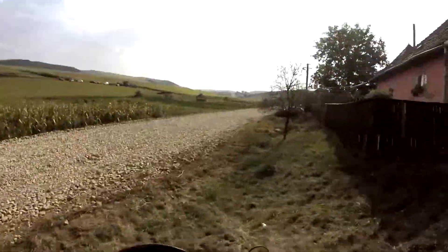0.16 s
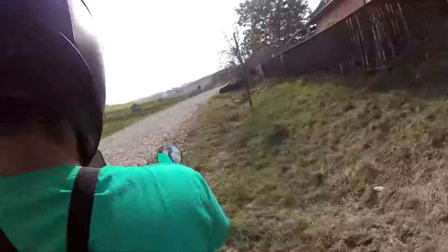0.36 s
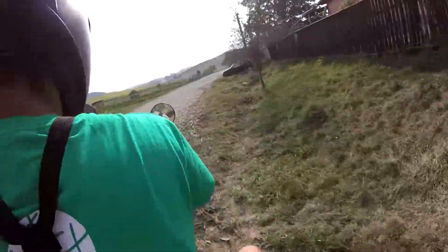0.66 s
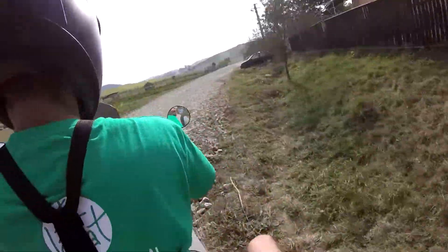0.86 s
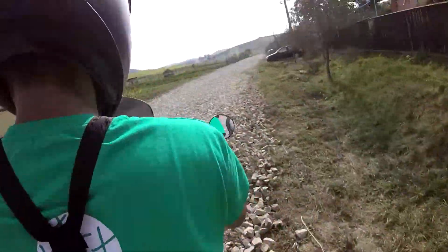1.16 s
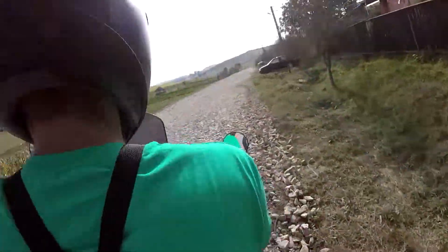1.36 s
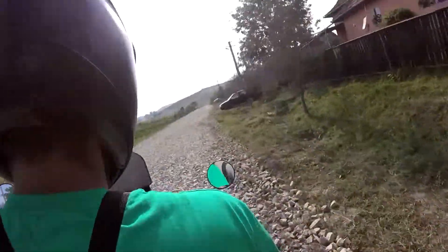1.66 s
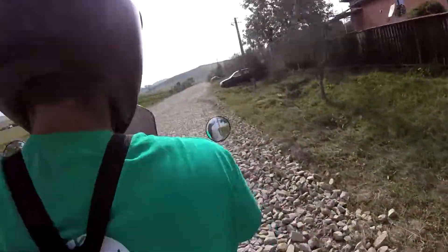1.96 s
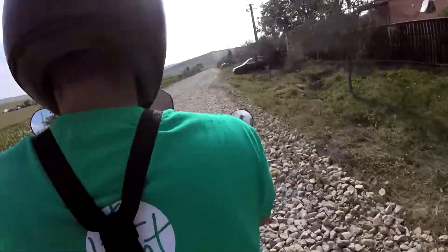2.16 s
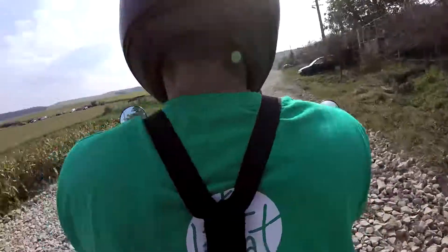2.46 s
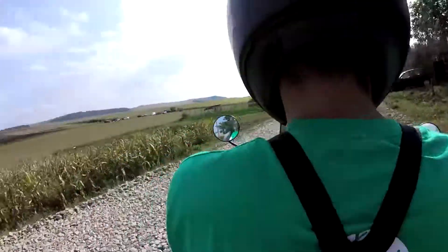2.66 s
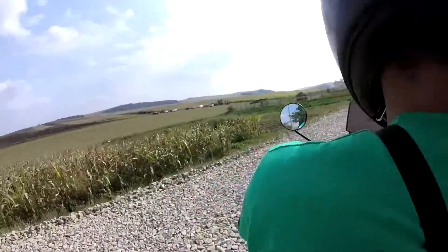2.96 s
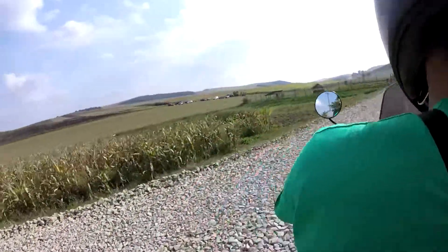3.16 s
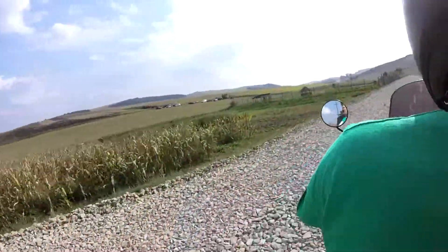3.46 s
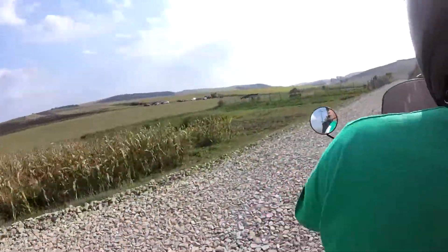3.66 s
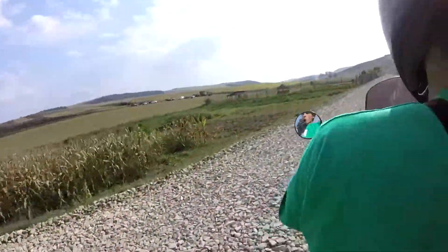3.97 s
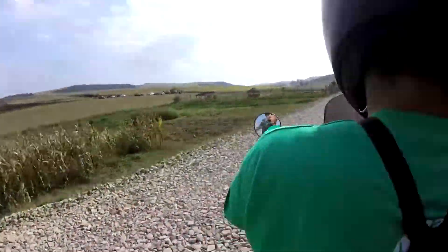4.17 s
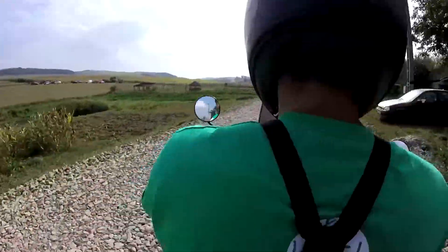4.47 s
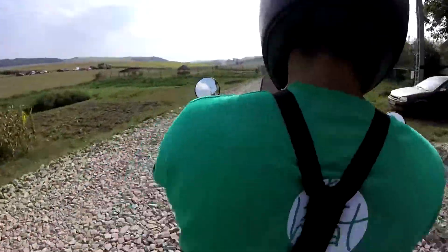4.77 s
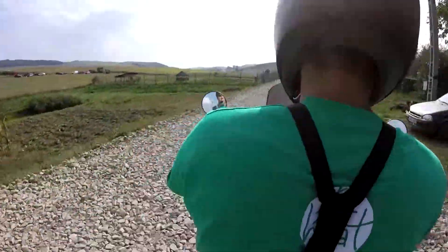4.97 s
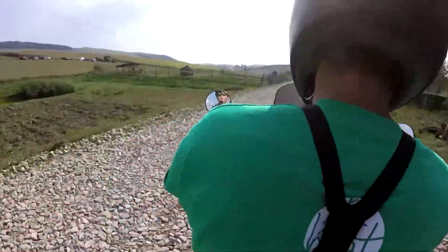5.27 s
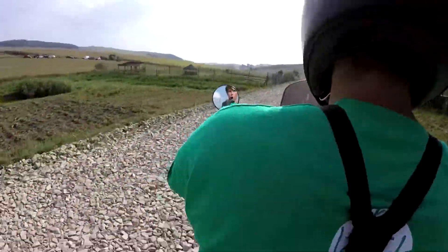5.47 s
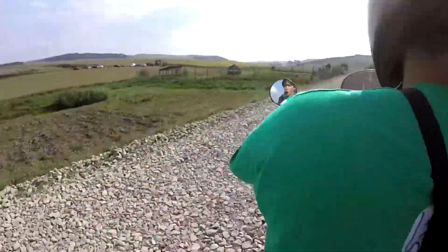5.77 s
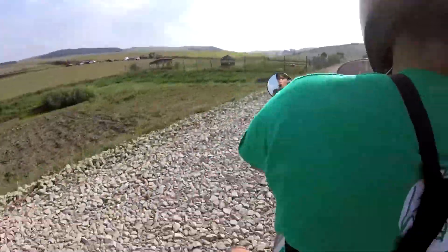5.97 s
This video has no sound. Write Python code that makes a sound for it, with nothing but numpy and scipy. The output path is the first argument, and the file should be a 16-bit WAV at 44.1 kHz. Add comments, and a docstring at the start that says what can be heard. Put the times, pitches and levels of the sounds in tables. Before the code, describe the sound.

From the passenger seat, a motorcycle engine putters, clatters and climbs to a whining growl while stones crunch, clack and strike the frame.

```python
"""A motorcycle thuds, clatters and whines as it pulls off a grass verge onto gravel and gathers speed.
Heard from the pillion seat: one exhaust pulse a cycle rings the silencer, and gear tones climb with the engine.
Tyres grind through gravel, loose stones crunch and clack, and some strike the frame: noise bursts through filters.
Speed and throttle drive the engine layers; pipe, intake, airbox and slow gears swell at speeds of their own.
Low coloured noise is the wind on the microphone; short deep wobbles are bumps that jolt it."""
import sys
import numpy as np
from scipy import signal
from scipy.fft import rfft, irfft
from scipy.io import wavfile
from scipy.ndimage import uniform_filter1d

SR = 44100
rng = np.random.default_rng(int(sys.argv[2]) if len(sys.argv) > 2 else 0)


def bounce(signal):
    """Save signal as a 16-bit WAV file at the path given by the first command-line argument."""
    frames = np.transpose(np.atleast_2d(signal))
    limited = np.clip(frames, -1, 1)
    pcm = np.round(limited * 32767).astype(np.int16)
    wavfile.write(sys.argv[1], SR, pcm)


N = 269451
TIME = np.arange(N) / SR
CRUISE = 20   # reference engine speed, firings per s


def from_db(db):
    """Decibels to gain."""
    return 10 ** (np.asarray(db) / 20)


def rms_one(x):
    """Scale to unit power."""
    return x / np.sqrt(np.mean(x ** 2) + 1e-20)


def evened(x):
    """Hold unit power over every quarter second."""
    return x / np.sqrt(np.abs(uniform_filter1d(x ** 2, SR // 4)) + 1e-20)


def in_time(rows):
    """Draw a straight-line curve through (time, value) rows, at every sample."""
    seconds, values = np.transpose(rows)
    return np.interp(TIME, seconds, values)


def drift(rate):
    """Smooth random wander of spread 1: noise that falls away above `rate` Hz."""
    hz = np.arange(N // 2 + 1) * SR / N
    return rms_one(irfft(rfft(rng.standard_normal(N)) / (1 + (hz / rate) ** 2), N))


def coloured(x, spectrum):
    """Give a signal a spectrum that falls away steeply past its ends; unit power."""
    hz = np.arange(1, N // 2 + 2) * SR / N
    at, db = np.transpose(spectrum)
    ends = 1 / np.sqrt((1 + (at[0] / hz) ** 8) * (1 + (hz / at[-1]) ** 8))
    colour = from_db(np.interp(np.log(hz), np.log(at), db))
    return rms_one(irfft(rfft(x) * ends * colour, N))


def resonate(x, resonances):
    """Ring parallel two-pole resonances, with alternating signs."""
    out = 0
    for k, (hz, width, db) in enumerate(resonances):
        r = np.exp(-np.pi * width / SR)
        poles = [1, -2 * r * np.cos(2 * np.pi * hz / SR), r * r]
        ring = (1 - r * r) / 2 * signal.lfilter([1, 0, -1], poles, x + 1e-18)
        out = out + (-1) ** k * from_db(db) * ring
    return out


def band(x, low_hz, high_hz):
    """Steep band-pass."""
    return signal.sosfilt(signal.butter(3, [low_hz, high_hz], "band", fs=SR, output="sos"), x)


def stroke(cycle, at, uneven_db):
    """One click a cycle as the crank passes `at`, each of its own strength."""
    passed = np.diff(np.floor(cycle - at), prepend=np.floor(-at)) > 0
    return passed * from_db(uneven_db * rng.standard_normal(N))


def puff(clicks, seconds):
    """Each click releases a dying burst of noise with the same energy."""
    r = np.exp(-2 / (seconds * SR))
    envelope = np.sqrt(signal.lfilter([1 - r], [1, -r], clicks ** 2 + 1e-18))
    return envelope * rng.standard_normal(N)


def level(firings, throttle, cruise_db, speed_db, throttle_db):
    """Level in dB: as given at cruise and full throttle, then dB per doubling of speed and of throttle."""
    return cruise_db + speed_db * np.log2(firings / CRUISE) + throttle_db * np.log2(np.maximum(throttle, .01))


def in_tune(x, centre, width, boost_db):
    """Gain in dB of a part that resonates over a range of speed or pitch."""
    return boost_db * np.exp(-((x - centre) / width) ** 4)


def song(firings, cruise_db, critical, width, boost_db):
    """Level in dB of a slow gear: it rises with speed and swells round its critical speed."""
    return cruise_db + 5.5 * np.log2(firings / CRUISE) + in_tune(firings, critical, width, boost_db)


def exhaust(cycle, firings, throttle):
    """The valve opens once a cycle: boom, bark and rasp, uneven and breathy on a closed throttle."""
    # low silencer resonances: f/Hz, width/Hz, level/dB
    boom_modes = [(83, 62, 6.5), (126, 47, 4.5), (176.6, 49, -7)]
    # upper silencer resonances: f/Hz, width/Hz, level/dB
    bark_modes = [(236, 36, 4), (300.5, 35.4, 4.5), (411, 46, -4)]
    # rasp of escaping gas: f/Hz, width/Hz, level/dB
    rasp_modes = [(1230, 230, 0), (2640, 134, -3.5), (2990, 180, -10.5)]
    idling = 1 - np.clip(throttle, 0, 1)
    burn = cycle + (.0025 + .028 * idling) * drift(14)   # no two charges burn alike
    blow = stroke(burn, at=.73, uneven_db=1.3)
    rush = rng.standard_normal(N) * np.sqrt(np.mean(blow ** 2))   # gas flowing between the pulses

    boom = band(resonate(blow + (.6 + 2 * idling) * rush, boom_modes), 64, 200)
    breathy_blow = blow + .25 * puff(blow, seconds=.014) + (.25 + 1.8 * idling) * rush
    bark = band(resonate(breathy_blow, bark_modes), 110, 530)
    rasp = resonate(puff(stroke(burn, at=.88, uneven_db=2.0), seconds=.025), rasp_modes)

    # the silencer comes into tune, in firings per s
    swell_db = in_tune(firings, centre=19, width=3.15, boost_db=6.1)
    boom_db = level(firings, throttle, cruise_db=-49, speed_db=-5.5, throttle_db=.86)
    bark_db = level(firings, throttle, cruise_db=-52, speed_db=-1, throttle_db=1.0) + swell_db
    rasp_db = level(firings, throttle, cruise_db=-62.5, speed_db=1, throttle_db=2.5) + swell_db
    return from_db(boom_db) * evened(boom) + from_db(bark_db) * evened(bark) + from_db(rasp_db) * evened(rasp)


def drone(cycle, firings, throttle):
    """The pipe hums on multiples of the firing rate; each swells as it climbs through the pipe's resonance."""
    # humming lines: multiple of the firing rate, level/dB
    hum_lines = [(4, 6), (5, -4.5), (6, 5.5), (7, 2)]
    crank = 2 * np.pi * (cycle - .98)
    hum = 0
    for multiple, db in hum_lines:
        swell_db = in_tune(multiple * firings, centre=108, width=24, boost_db=7)   # centre and width in Hz
        hum = hum + from_db(db + swell_db + 1.3 * drift(12)) * np.cos(multiple * crank)
    drone_db = level(firings, throttle, cruise_db=-55.3, speed_db=-2.5, throttle_db=1.5)
    return from_db(drone_db) * np.sqrt(2) * hum


def breathe(valve, at, rush):
    """One pulse of air a cycle with a short hiss, over steady rushing noise."""
    clicks = stroke(valve, at=at, uneven_db=.9)
    return evened(clicks + .15 * puff(clicks, seconds=.012)) + rush * rng.standard_normal(N)


def intake(cycle, firings, throttle):
    """The carburettor gulps once a cycle and the airbox honks after it, each through its resonances."""
    # intake tract resonances: f/Hz, width/Hz, level/dB
    tract_modes = [(243, 100, 2.5), (300.4, 40.6, 7.5), (395, 42, -3.5)]
    # airbox resonances: f/Hz, width/Hz, level/dB
    airbox_modes = [(600, 55, 7.5), (648, 55, 8), (700, 55, 3.5)]
    valve = cycle + .0008 * drift(14)
    gulp = band(resonate(breathe(valve, at=.51, rush=.26), tract_modes), 130, 530)
    honk = band(resonate(breathe(valve, at=.61, rush=.06), airbox_modes), 532, 827)

    gulp_db = level(firings, throttle, cruise_db=-53, speed_db=5.5, throttle_db=.75)
    honk_db = level(firings, throttle, cruise_db=-59, speed_db=10.5, throttle_db=.6)
    # tract and airbox come into tune, in firings per s
    gulp_db = gulp_db + in_tune(firings, centre=29.5, width=8.5, boost_db=6.8)
    honk_db = honk_db + in_tune(firings, centre=28.8, width=3.3, boost_db=5.7)
    return from_db(gulp_db) * evened(gulp) + from_db(honk_db) * evened(honk)


def clatter(cycle, firings, throttle):
    """Valves and piston tap the case and fins over the churn of the engine."""
    # engine case colour: f/Hz, level per Hz/dB
    case_colour = [(400, 4), (520, -5), (680, -3.5), (900, -12), (1350, -5.5), (1550, -19.5), (2100, -6.5),
                   (2800, -47), (3300, -22), (4300, -43), (5400, -52)]
    # case and cooling fin resonances: f/Hz, width/Hz, level/dB
    fin_modes = [(872, 99, 3.5), (1054, 31, 5.5), (1268, 30, 3.5), (1546, 176, 0.5), (1792, 110, 5.5),
                 (2080, 38, 6.5), (2440, 330, 1), (2727, 100, 6), (3036, 115, 0.5), (3490, 150, -2),
                 (4310, 52, -6.5)]
    taps = stroke(cycle, at=.93, uneven_db=6.0) + 1.54 * stroke(cycle, at=.31, uneven_db=7.5)
    churn = rng.standard_normal(N) * from_db(1.56 * drift(31))
    case = coloured(.42 * evened(puff(taps, seconds=.008)) + churn, case_colour)
    fins = rms_one(resonate(rng.standard_normal(N) + .5 * evened(puff(taps, seconds=.015)), fin_modes))
    clatter_db = level(firings, throttle, cruise_db=-49.5, speed_db=7.2, throttle_db=.38)
    return from_db(clatter_db) * (case + .75 * fins)


def mesh(cycle, teeth, twist, wander, loaded_at, throb_db, pulse_db):
    """A gear tone: level and pitch swing with the load in each cycle; the shaft twists, backlash smears."""
    crank = 2 * np.pi * (cycle - loaded_at)
    swing = np.sin(crank) + np.sin(2 * crank) / 2
    tone = np.sin(2 * np.pi * teeth * cycle + twist * swing + wander * drift(30))
    load_db = throb_db * np.cos(crank) + pulse_db * np.cos(2 * crank)   # once and twice a cycle
    return rms_one(tone * from_db(load_db + 1.5 * drift(48)))


def gears(cycle, firings, throttle):
    """Gears sing at fixed multiples of engine speed; the fast ones are rough and flare through the cover."""
    # gear cover resonances: f/Hz, width/Hz, level/dB
    cover_modes = [(1070, 90, -4), (1255, 100, -3.5), (1400, 70, -5), (1590, 80, -5.5), (1832, 50, 5.5),
                   (2025, 60, 2.5), (2560, 170, 0)]
    # teeth = tooth contacts per engine cycle
    drive = mesh(cycle, teeth=27.3, twist=.4, wander=.25, loaded_at=.85, throb_db=4, pulse_db=1)
    chain_overtone = mesh(cycle, teeth=40.9, twist=.5, wander=.6, loaded_at=.83, throb_db=2, pulse_db=0)
    gearbox = mesh(cycle, teeth=54.6, twist=1.3, wander=.9, loaded_at=.13, throb_db=2.5, pulse_db=-2)
    primary = mesh(cycle, teeth=76, twist=1.4, wander=1.9, loaded_at=.76, throb_db=2.5, pulse_db=6.5)

    # critical speed and half-width in firings per s
    drive_db = song(firings, cruise_db=-69.5, critical=28.9, width=4.5, boost_db=15)
    chain_overtone_db = song(firings, cruise_db=-68.5, critical=30.1, width=2.5, boost_db=10.5)
    # levels that drive the cover
    gearbox_db = level(firings, throttle, cruise_db=-51.5, speed_db=1, throttle_db=6)
    primary_db = level(firings, throttle, cruise_db=-49, speed_db=3.5, throttle_db=5.5)
    slow = from_db(drive_db) * drive + from_db(chain_overtone_db) * chain_overtone
    fast = from_db(gearbox_db) * gearbox + from_db(primary_db) * primary
    return slow + resonate(fast, cover_modes)


def tyres(firings):
    """Pebbles grind under the tyres as random noise grains, more of them and louder with engine speed."""
    # gravel colour: f/Hz, level per Hz/dB
    gravel_colour = [(2060, -26), (3500, -5), (3720, -4), (4350, -5.5), (5420, -13), (6110, -8.5),
                     (6900, -12.5), (8080, -10), (8960, -18), (9750, -18), (10700, -23), (13000, -23),
                     (14900, -50.5)]
    born = rng.random(N) < 45 * firings / SR   # 45 grains per firing
    grains = born * from_db(2.13 * np.minimum(rng.exponential(1, N), 4))
    crunch = .76 * evened(puff(grains, seconds=.0025)) + rng.standard_normal(N)
    gravel_db = -60 + 7.5 * np.log2(firings / CRUISE)
    return from_db(gravel_db) * coloured(crunch * from_db(.79 * drift(28)), gravel_colour)


def hump(centre, db, length):
    """A smooth swell that peaks at `centre` seconds."""
    return from_db(db) * np.exp(-2 * ((TIME - centre) / length) ** 2)


def crunches():
    """Loose stones give way in short swells of sharp knocks, and in patches across the road's edge."""
    # heaps of loose stones the tyres plough through: t/s, level/dB, length/s
    heaps = [(1.352, -53.5, 0.023), (1.461, -52, 0.049), (1.688, -60, 0.047), (1.888, -53, 0.011),
             (1.967, -55, 0.041), (2.045, -54, 0.014), (2.715, -49, 0.04), (4.225, -45.5, 0.02),
             (4.391, -42.5, 0.017), (5.67, -43, 0.024), (5.745, -42.5, 0.013), (5.818, -46, 0.018),
             (5.837, -43, 0.013), (5.886, -36, 0.014)]
    # their colour: f/Hz, level per Hz/dB
    loose_colour = [(800, 9), (1300, 6.5), (2000, 8.5), (3100, 4), (4200, -8.5), (6000, -18)]
    shoulder = hump(centre=1.97, db=-59.5, length=.89) * from_db(1.5 * drift(12))   # loose edge of the road
    swell = shoulder + sum(hump(*heap) for heap in heaps)
    knocks = (rng.random(N) < 1600 / SR) * rng.standard_normal(N)   # about 1600 per s
    return swell * coloured(knocks, loose_colour)


def clacks():
    """Two stones knock and chatter for an instant, each pair ringing at its own pitch."""
    # stone against stone: t/s, f/Hz, level/dB (the peak is twice this gain)
    knocked_pairs = [(0.87, 2170, -49), (1.353, 880, -51.5), (1.427, 2450, -58), (1.573, 4250, -57),
                     (1.589, 7600, -62), (1.678, 3000, -51), (1.727, 3170, -55), (1.806, 1240, -47),
                     (1.837, 2650, -59), (1.88, 3380, -51), (1.982, 3260, -48), (2.036, 710, -48),
                     (2.188, 1630, -47), (4.221, 2660, -46), (4.722, 1340, -43.5)]
    t60_s, q = .079, 11
    out, age = np.zeros(N), np.arange(SR // 10) / SR
    for s, hz, db in knocked_pairs:
        chatter = rng.standard_normal(len(age)) * from_db(-60 * age / t60_s)
        ring = resonate(chatter, [(hz, hz / q, 0)])
        start = round(s * SR)
        out[start:start + len(age)] += from_db(db) * 2 * ring / np.abs(ring).max()
    return out


def stones(firings):
    """Stones strike the frame, skitter briefly and ring it; chips fly more often and harder with speed."""
    # hardest strikes: t/s, click level/dB going into the frame
    hard_strikes = [(1.8123, -54), (2.049, -50), (2.715, -49), (2.9354, -50.5), (4.0788, -40.5),
                    (4.2876, -50), (4.382, -45), (5.65, -39.5), (5.744, -40), (5.768, -45), (5.812, -32),
                    (5.849, -44)]
    # frame resonances: f/Hz, width/Hz, level/dB
    frame_modes = [(2510, 104, 11), (3300, 300, 7.5), (4410, 320, 7), (6310, 280, 2.5), (8100, 330, 7.5),
                   (8450, 470, -3), (9360, 170, -3.5), (13000, 500, -16)]
    pace = firings / CRUISE
    flying = rng.random(N) < 4 * pace / SR   # 4 chips per s at cruise
    clicks = flying * pace * from_db(-59 + 2.5 * rng.standard_normal(N))
    for s, db in hard_strikes:
        clicks[round(s * SR)] = from_db(db)
    return from_db(25) * resonate(.35 * clicks + puff(clicks, seconds=.013), frame_modes)


def whirrs():
    """Brief narrow bands of noise whirr as the machine rolls off the verge."""
    # whirrs on the verge and the road's edge: t/s, f/Hz, level/dB, length/s
    verge_whirrs = [(0.05, 1450, -59, 0.073), (0.237, 1160, -55.5, 0.059), (0.484, 2220, -62, 0.11),
                    (0.66, 1200, -59.5, 0.18), (0.723, 2460, -57, 0.033), (0.777, 920, -51, 0.019),
                    (1.464, 2610, -53.5, 0.039), (1.99, 2010, -57, 0.21)]
    out = np.zeros(N)
    for s, hz, db, length in verge_whirrs:
        ring = rms_one(resonate(rng.standard_normal(N), [(hz, 110, 0)]))
        out += from_db(db) * np.exp(-((TIME - s) / length) ** 2) * ring
    return out


def wind():
    """Slow lumpy eddies on the microphone: deep coloured noise that follows the gusts."""
    # gusts: t/s, level/dB
    gusts = [(0, -47.5), (.5, -34.5), (.95, -28.5), (1.7, -23.5), (2.3, -29.5), (4.2, -19), (5, -23),
             (6.11, -23)]
    # wind colour: f/Hz, level per Hz/dB
    wind_colour = [(8, 4), (13, 6), (29, -3), (41, -8), (64, -17), (90, -28), (130, -38), (200, -45)]
    return from_db(in_time(gusts)) * evened(coloured(rng.standard_normal(N), wind_colour))


def bumps():
    """Each jolt of the microphone swells and dies as a short wobble, mostly deep; a higher wobble rides on the
    hardest one."""
    # jolts, and a higher wobble on the hardest: t/s, peak/dB, f/Hz, swell/s, t60/s
    jolts = [(0.905, -14.5, 29.2, 0.007, 0.066), (1.414, -12.5, 24, 0.0091, 0.14),
             (1.5007, 3, 52, 0.0059, 0.056), (1.497, -18, 118, 0.0023, 0.081),
             (1.836, -13, 31.4, 0.0088, 0.075), (4.851, -9, 41.3, 0.0071, 0.071),
             (5.687, -3, 46.7, 0.0078, 0.08), (5.788, -8, 33.7, 0.027, 0.067),
             (5.868, -12, 41.8, 0.089, 0.14), (5.946, -20.5, 190, 0.0019, 0.013)]
    out = np.zeros(N)
    for s, db, hz, swell, t60 in jolts:
        age = TIME - s
        rise = -np.minimum(age / swell, 0) ** 2 / 2
        decay = -np.log(1000) * np.maximum(age, 0) / t60
        out += from_db(db) * np.exp(rise + decay) * np.cos(2 * np.pi * hz * age)
    return out


def scene():
    """Engine, road and air at the pillion seat; one crank position times every engine layer."""
    # engine speed: t/s, firings per s
    engine_speed = [(0, 10.47), (.4, 10.12), (.76, 10.83), (1.2, 12.12), (1.62, 13.66), (1.95, 13.83),
                    (2.3, 12.87), (2.7, 14.66), (3.1, 16.01), (3.3, 17.15), (3.5, 18.57), (3.8, 19.86),
                    (4.15, 21.52), (4.5, 23.45), (4.75, 24.65), (5, 26.02), (5.6, 29.5), (5.85, 30.73),
                    (6.11, 31.61)]
    # the rider's hand: t/s, throttle (0-1)
    hand = [(.27, 0), (.4, 0.42), (2.5, 0.3), (3.4, 0.93)]
    firings, throttle = in_time(engine_speed), in_time(hand)
    cycle = np.cumsum(firings) / SR + .002 * drift(5.6)   # engine cycles turned, slightly unsteady

    pipes = exhaust(cycle, firings, throttle) + intake(cycle, firings, throttle)
    pipes = pipes + drone(cycle, firings, throttle)
    engine = pipes + clatter(cycle, firings, throttle) + gears(cycle, firings, throttle)
    road = tyres(firings) + crunches() + clacks() + stones(firings) + whirrs()
    return (engine + road + wind() + bumps())[None]


def record(dry):
    """The hardest jolt overloads the input and clips; a steep low-pass cuts the top above 15 kHz."""
    low_pass = signal.ellip(10, .1, 80, 15000, fs=SR, output="sos")
    return signal.sosfilt(low_pass, np.clip(dry, -1, 1))


dry = scene()
out = record(dry)
bounce(out)
```